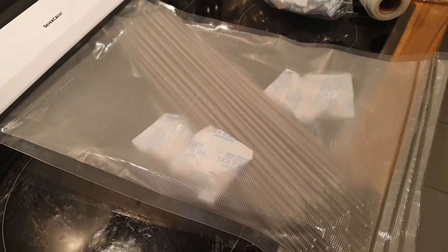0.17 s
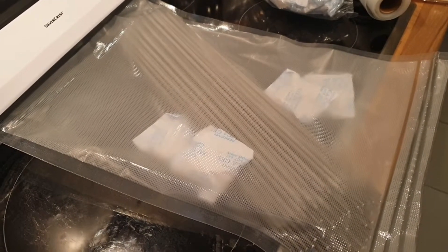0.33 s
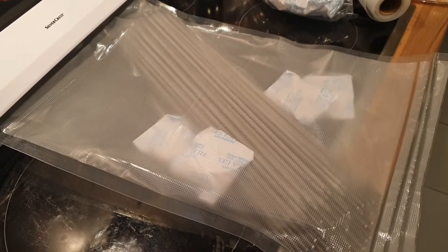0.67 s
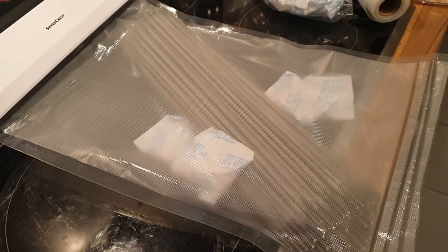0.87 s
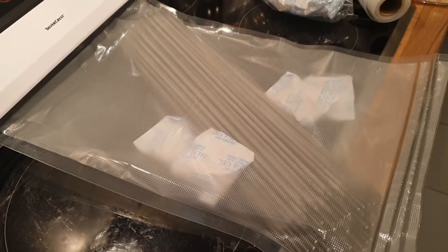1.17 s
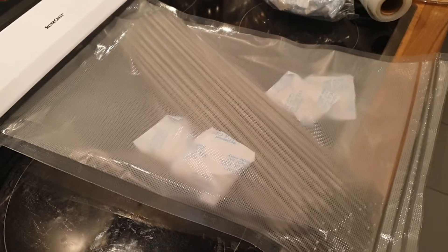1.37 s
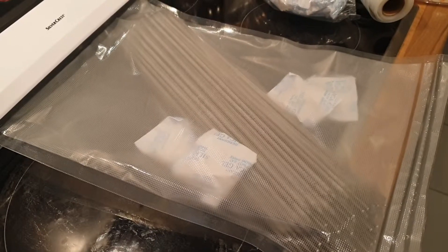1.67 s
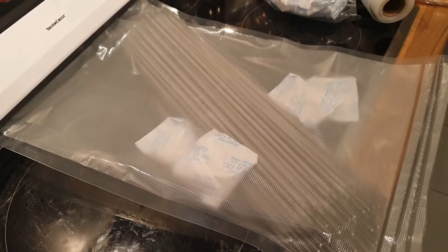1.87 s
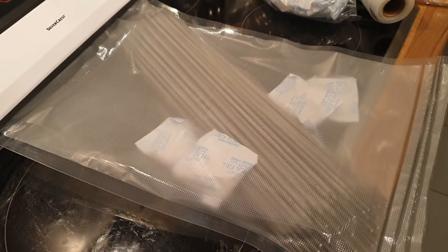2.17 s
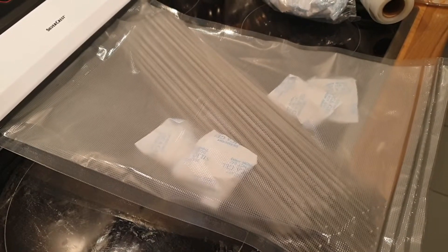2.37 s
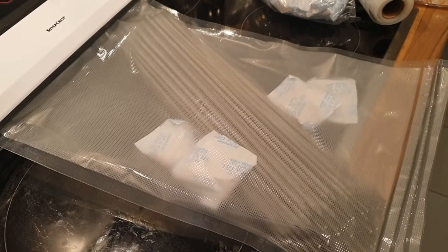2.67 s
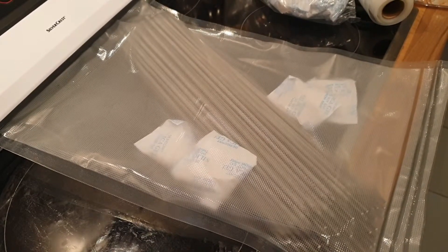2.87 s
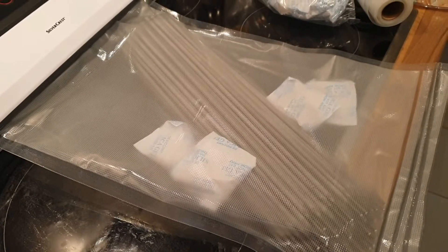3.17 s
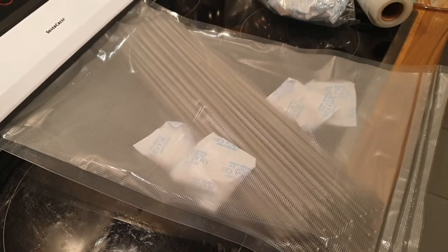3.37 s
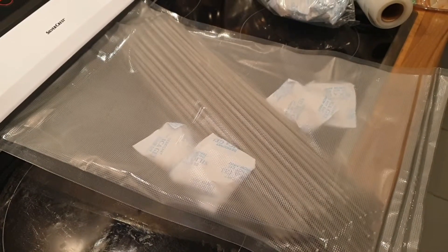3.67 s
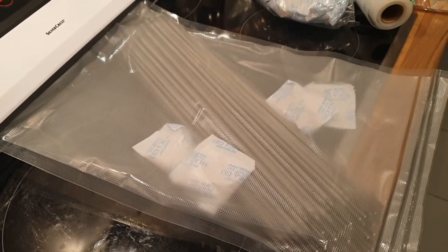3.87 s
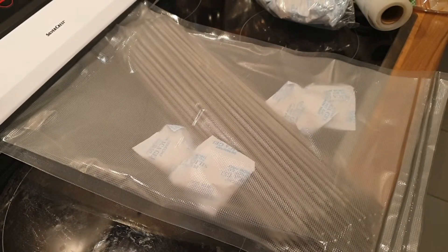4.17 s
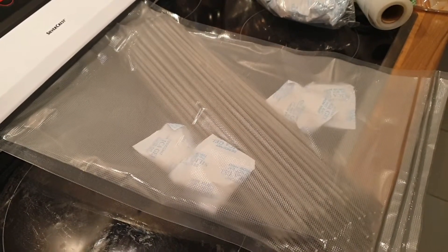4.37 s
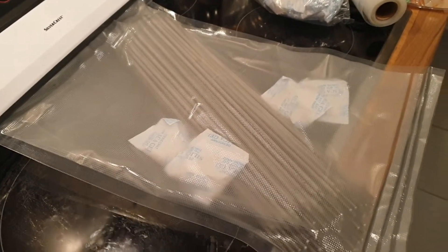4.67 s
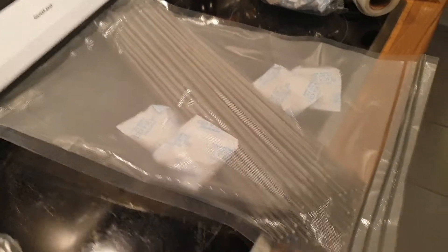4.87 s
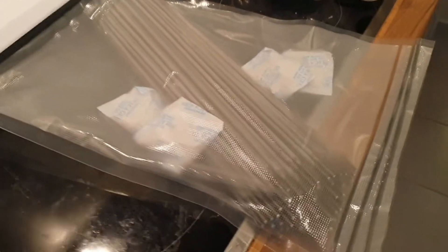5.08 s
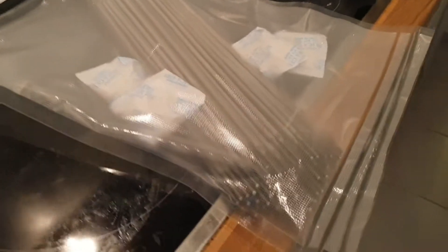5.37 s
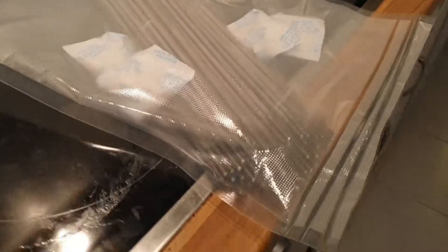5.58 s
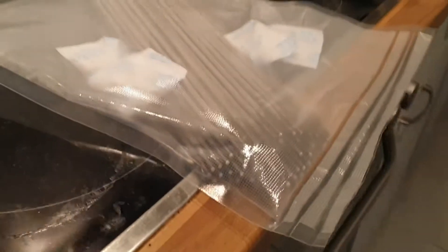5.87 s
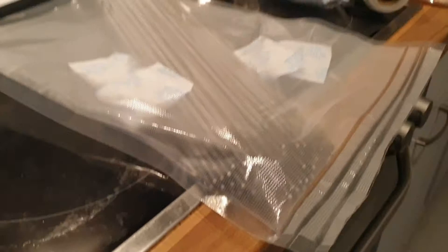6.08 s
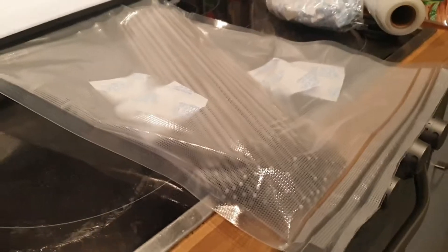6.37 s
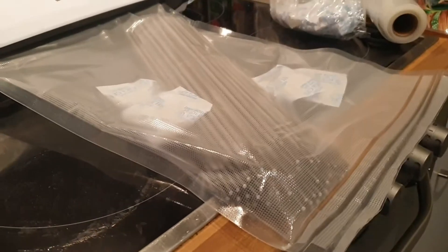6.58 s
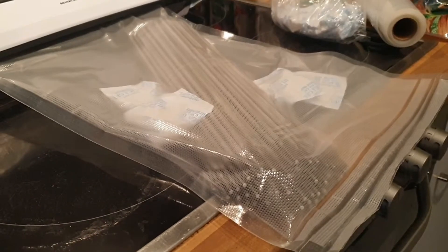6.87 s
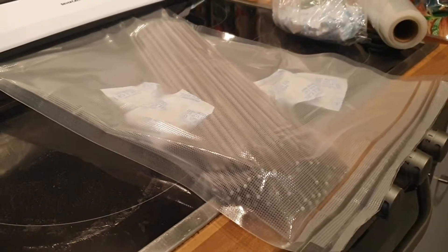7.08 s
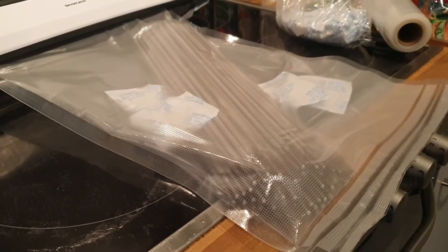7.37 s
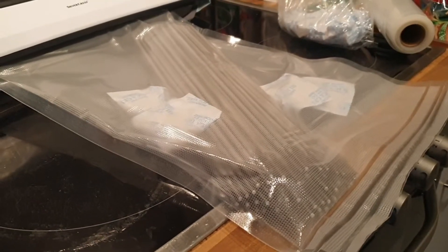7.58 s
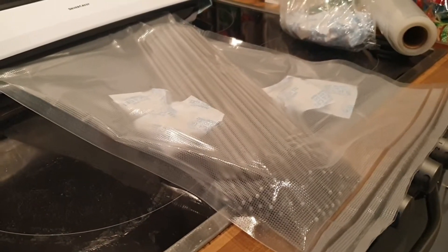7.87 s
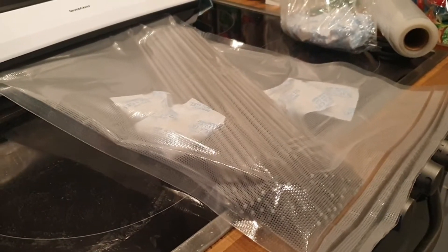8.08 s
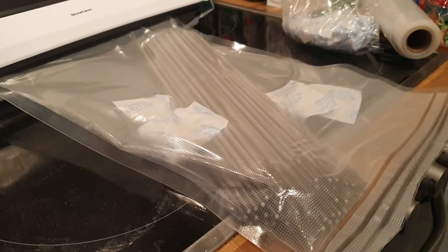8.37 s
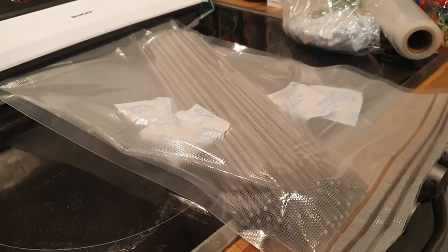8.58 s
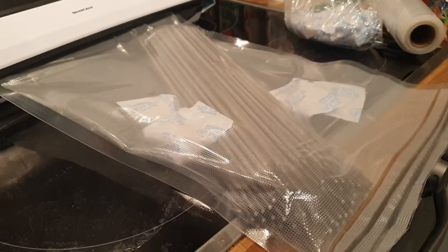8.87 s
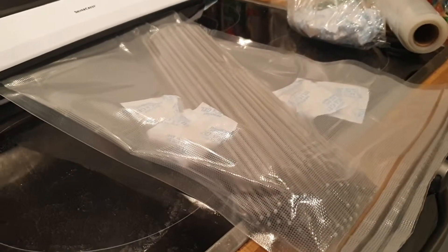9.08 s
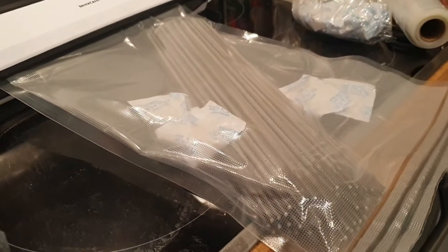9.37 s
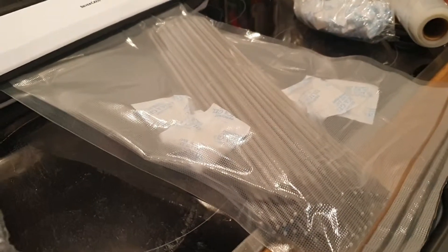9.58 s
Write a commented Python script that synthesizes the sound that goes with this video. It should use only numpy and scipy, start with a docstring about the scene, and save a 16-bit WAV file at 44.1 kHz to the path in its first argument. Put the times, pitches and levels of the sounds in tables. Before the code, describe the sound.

A small piston pump in a countertop vacuum sealer runs without pause, a low buzzing hum with a hard plastic ring, fine valve rattle and faint airy hiss. Thin plastic film ticks now and then. The close handheld stereo microphone moves around five to six seconds, changing the drone's colour, and a sharp crackle stands out near nine seconds.

```python
"""A small piston pump in a kitchen vacuum sealer drones evenly, slowing a little as the bag empties.
Each stroke is one repeated cycle: a thud, a knock, ringing plastic housing and a rattling valve.
Noise shaped by pitch makes the air, part of it in one puff a stroke; the bag film snaps and rustles.
A hand-held stereo microphone drifts between four spots and swings round midway, recolouring the drone."""
import sys
import numpy as np
from scipy import signal
from scipy.fft import rfft, irfft
from scipy.io import wavfile
from scipy.ndimage import uniform_filter1d

SR = 44100
rng = np.random.default_rng(int(sys.argv[2]) if len(sys.argv) > 2 else 0)


def digitize_waveform(pressure):
    """Quantize a signal to 16-bit integers and store it at the path in sys.argv[1].

    Rows of a 2-D input are taken as channels; values are limited to [-1, 1].
    """
    field = np.atleast_2d(pressure).T
    bounded = np.clip(field, -1, 1)
    quanta = np.round(bounded * 32767).astype(np.int16)
    wavfile.write(sys.argv[1], SR, quanta)


N = 429534  # length in samples
STROKE_HZ = 71.6  # mean strokes per second
CYCLE = 4096  # samples in one stored stroke
ORDERS = np.arange(CYCLE // 2 + 1)  # multiples of the stroke rate
LINE_SCALE = CYCLE / 2 * np.sqrt(2)  # a spectrum line of size 1 becomes a sine of rms 1


def gain_of(db):
    """Turns decibels into gain."""
    return 10 ** (np.asarray(db) / 20)


def evened(x):
    """Scales a signal to rms 1."""
    return x / np.sqrt(np.mean(x ** 2) + 1e-20)


def read(points, hz, axis=1):
    """Reads one column of a spectrum table, on a log-frequency axis."""
    table = np.transpose(points)
    return np.interp(np.log(hz + 1), np.log(table[0] + 1), table[axis])


def curve(points, t):
    """Reads a control curve at times t, with straight lines between its points."""
    return np.interp(t, *np.transpose(points))


def sides(db):
    """Gives left and right gains for a level difference; positive is louder on the left."""
    return gain_of([[db / 2], [-db / 2]])


def wander(size):
    """Makes smooth chance of rms 1 that changes over about size samples."""
    once = uniform_filter1d(rng.standard_normal(N), size)
    return evened(uniform_filter1d(once, size))


def turnover(hz, centre_hz, width_hz):
    """Gives the phase lag across a resonance, from 0 to pi."""
    return np.pi / 2 + np.arctan(2 * (hz - centre_hz) / width_hz)


# Where the microphone is: start_s, spot (0-3)
MIC_SPOT = [(0, 0), (2.8, 0.25), (2.95, 1), (4.8, 1), (5.05, 1.1), (5.45, 2), (5.8, 2.5), (6.3, 3),
            (9.74, 3)]


def swing(t):
    """Tells how far the microphone has swung round, 0-1, while it moves from spot 1 to spot 3."""
    return np.clip(curve(MIC_SPOT, t) / 2 - .5, 0, 1)


# How fast the pump runs: time_s, rate_hz (strokes per second)
PUMP_SPEED = [(0.0, 72.183), (1.4, 72.114), (2.6, 71.985), (3.3, 71.759), (4.5, 71.673), (6.0, 71.574),
              (7.4, 71.497), (8.9, 71.284), (9.74, 71.265)]


def strokes():
    """Adds up the speed into the crank angle in turns; the crank runs a hair early or late."""
    speed_hz = curve(PUMP_SPEED, np.arange(N) / SR)
    return .88 + np.cumsum(speed_hz) / SR + .0012 * wander(size=2000)


# Colour of the air noise before the swing: pitch_hz, left_db, right_db (both relative)
AIR_COLOUR_BEFORE = [(30.4, -78, -74), (124, -62.5, -80), (323, -80, -69), (430, -95, -77),
                     (625, -76, -72.5), (780, -80, -75), (1440, -78, -76), (1770, -64, -69),
                     (2400, -80, -81), (3300, -80, -82), (4900, -78.5, -97), (7600, -86.5, -85),
                     (8400, -90.5, -91.5), (10660, -78, -87.5), (13200, -88.5, -88), (15400, -88, -101)]
# Colour of the air noise after the swing: pitch_hz, left_db, right_db (both relative)
AIR_COLOUR_AFTER = [(30, -74, -73), (129, -65.5, -75), (310, -74, -77), (430, -89, -74), (630, -71, -71),
                    (850, -77.5, -87), (1570, -74, -75), (1850, -63, -78), (2330, -81, -94),
                    (3180, -80, -83.5), (5050, -83, -89.5), (7100, -84, -88.5), (8200, -93.5, -91),
                    (10500, -84, -92), (13100, -90, -87.5), (15400, -89, -102)]
# How alike the air is in both ears: pitch_hz, likeness (0-1)
AIR_LIKENESS = [(30, 0.91), (300, 1), (800, 0.25), (1400, 0.023), (3000, 0.068), (15000, 0.04)]
# How much of the air power comes in puffs: pitch_hz, share (0-1)
PUFF_SHARE = [(900, 0.028), (1800, 0.2), (4000, 0.1), (7000, 0.88), (10500, 0.44), (15000, 0.83)]


def air(turns):
    """Shapes noise into a steady flow plus a share that escapes in one puff a stroke."""
    hz = np.fft.rfftfreq(1024, 1 / SR)
    t = np.arange(N // 256 + 5) * 256 / SR
    swung = swing(t)
    colour_db = np.array([
        np.outer(read(AIR_COLOUR_BEFORE, hz, axis=ear), 1 - swung)
        + np.outer(read(AIR_COLOUR_AFTER, hz, axis=ear), swung)
        for ear in (1, 2)])
    # smooth chance changes over pitch and time
    patches = uniform_filter1d(rng.standard_normal((len(t), 513)).T, 8, 0)
    patches = evened(uniform_filter1d(patches, 16, 1))
    level = gain_of(colour_db + 1.5 * patches + 14.5)
    same = read(AIR_LIKENESS, hz)[:, None]
    share = read(PUFF_SHARE, hz)[:, None]
    fall = np.exp(-((turns + 0.16) % 1) / 1.0)
    rise = np.minimum((turns + .2) % 1 / 0.067, 1)
    puff = evened(fall * rise)
    out = np.zeros((2, N))
    for part, gate in ((1 - share, 1), (share, puff)):
        a, b, c, d = rng.standard_normal((len(t), 513, 4)).T
        left = a + 1j * b
        right = same * left + np.sqrt(1 - same ** 2) * (c + 1j * d)
        spectrum = np.array([left, right]) * level * np.sqrt(part)
        out += gate * signal.istft(spectrum, nperseg=1024, noverlap=768)[1][:, :N]
    return out


# Ringing modes of the bag film: pitch_hz, width_hz (wider dies sooner)
FILM_MODES = [(800, 500), (1200, 350), (1520, 330), (2500, 600), (3350, 500), (4600, 900), (6600, 1100),
              (10800, 2000)]


def film(centre_hz, spread, db):
    """Rings the film when a crease near centre_hz lets go; a harder crack reaches every mode."""
    t = np.arange(600)[:, None] / SR
    hz, width = np.transpose(FILM_MODES)
    octaves_away = np.log2(hz / centre_hz)
    share = .7 * gain_of(db) + np.exp(-(octaves_away / spread) ** 2)
    sign = (-1) ** np.arange(len(hz))  # neighbouring modes start in opposite directions
    modes = sign * share * np.exp(-np.pi * width * t) * np.sin(2 * np.pi * hz * t)
    ring = modes.sum(1)
    return ring / abs(ring).max()


# Single snaps: start_s, level_db, centre_hz, spread_octaves, left_right_db, right_late_ms
BAG_SNAPS = [(2.137, -24, 1900, .5, -5, 0.13), (2.9254, -33, 3000, .8, 3, .1),
             (3.402, -30, 1300, .5, -2, .1), (3.6886, -24, 3000, .3, 0, 0), (4.2755, -23, 1200, .45, 1, .2),
             (4.801, -32, 2300, .6, -4, 0), (5.0601, -34, 2600, 1.1, -3, 0),
             (6.876, -23.5, 6700, 0.66, 11, 0.18), (8.979, -9, 1900, .55, 2, .16),
             (9.0197, -17, 1400, .4, 1, .2), (9.042, -22, 1500, 0.94, 4, .2),
             (9.558, -23, 1800, .8, 4, 0.16)]
# Bunches of tiny creases: middle_s, length_s (middle to 1/e), level_db, centre_hz, left_right_db
BAG_RUSTLES = [(0.792, 0.058, -44.5, 3700, 2), (2.191, .04, -49, 3500, 2), (8.524, 0.056, -55, 5000, 2),
               (8.99, .018, -41, 3000, 2), (9.05, .025, -47, 2800, 2)]


def bag():
    """Plays single snaps with a short scatter from the counter, and a few bunches of tiny creases."""
    out = np.zeros((2, N + SR))
    t = np.arange(4000) / SR
    for start_s, db, hz, spread, pan_db, late_ms in BAG_SNAPS:
        scatter = .022 * rng.standard_normal((2, 4000)) * gain_of(-60 * t / .16) * (t > .002)
        scatter[[0, 1], [0, round(late_ms * SR / 1000)]] = 1  # the direct snap in each ear
        sound = signal.fftconvolve(scatter, film(hz, spread, db)[None])
        out[:, round(start_s * SR):][:, :sound.shape[1]] += gain_of(db) * sides(pan_db) * sound
    t = np.arange(-6000, 6000) / SR
    for middle_s, length, db, hz, pan_db in BAG_RUSTLES:
        creases = rng.standard_normal((2, len(t))) * (rng.random(len(t)) < .05)
        rustle = evened(signal.fftconvolve(creases, film(hz, 1.0, db)[None], "same", axes=1))
        rustle = rustle * np.exp(-(t / length) ** 2)
        out[:, round((middle_s + t[0]) * SR):][:, :len(t)] += gain_of(db) * sides(pan_db) * rustle
    return out[:, :N]


# Valve rattle: pitch_hz (at the starting speed), width_hz (of each of two stacked resonances),
# spot0_db, spot1_db, spot2_db, spot3_db, left_right_db
VALVE_RATTLE = [(2480, 680, -48, -53.5, -47.5, -54, 3), (3020, 2100, -58, -56, -59.5, -57, 7.5),
                (4160, 2200, -58, -59.5, -57, -63, -9), (5150, 370, -58.5, -58, -69, -65, 12.5),
                (5860, 460, -57, -60.5, -52, -57.5, 12), (6890, 1070, -58, -58, -56, -58, 6.5),
                (10600, 1100, -75, -82, -72, -61, 14)]


def rattle_cycle(spot):
    """Lets the valve flap land and bounce within one stroke, ringing its modes."""
    hz = ORDERS * PUMP_SPEED[0][1]
    turn = np.arange(CYCLE) / CYCLE
    landing = 0.37 + np.exp(-((turn - .05) % 1) / 0.058)
    lines = np.zeros((2, len(ORDERS)), complex)
    for mode_hz, width, *db, pan_db in VALVE_RATTLE:
        bounces = rng.standard_normal((2, CYCLE)) * landing
        ring = rfft(bounces) / (1 + 2j * (hz - mode_hz) / width) ** 2 * (hz > 2250)
        ring /= np.linalg.norm(ring, axis=1)[:, None]
        lines += gain_of(db[spot]) * sides(pan_db) * ring
    return irfft(lines) * LINE_SCALE


# Modes of the plastic housing: pitch_hz (at the mean speed), width_hz,
# before the swing: left_db, right_db, left_lead_rad; after it: left_db, right_db, left_lead_rad;
# gained in the small shift from spot 0 to spot 1: left_db, right_db
HOUSING_MODES = [(772.0, 20.0, -43.6, -43.7, 1.2, -42.0, -43.2, 1.5, 0.6, -1.5),
                 (990.0, 52.0, -44.9, -46.7, 0.2, -45.8, -52.4, 1.1, -1.8, -5.2),
                 (1124.0, 20.0, -39.3, -42.4, 1.7, -45.2, -48.7, -4.2, 3.3, -2.0),
                 (1301.0, 30.0, -45.9, -48.0, 3.5, -44.2, -46.2, 0.6, -4.6, 3.8),
                 (1397.0, 121.0, -44.3, -46.4, 2.6, -58.6, -70.0, -2.5, 1.6, 1.1),
                 (1588.0, 23.0, -40.0, -49.1, 4.0, -44.1, -47.7, -2.9, 1.3, -9.0),
                 (1679.0, 51.0, -33.4, -34.5, 3.4, -37.9, -37.7, 0.7, 0.8, -2.1),
                 (1738.0, 20.0, -43.6, -70.0, 3.7, -25.0, -38.6, -1.4, -9.0, -9.0),
                 (1796.0, 20.0, -39.8, -37.3, -0.8, -67.3, -34.0, -0.6, -0.0, 4.4),
                 (1889.0, 46.0, -42.1, -44.0, -2.2, -35.3, -61.0, 0.7, -0.3, -1.1),
                 (2040.0, 158.0, -49.6, -44.0, -1.9, -38.7, -48.0, -3.0, -3.6, -2.1),
                 (2059.0, 64.0, -44.7, -51.9, -2.3, -40.5, -51.5, -2.5, -0.4, -9.0),
                 (2199.0, 87.0, -36.1, -34.6, -4.4, -32.7, -65.5, 0.6, 9.0, 6.7),
                 (2197.0, 74.0, -34.3, -35.0, -4.5, -33.3, -58.2, 0.8, 6.0, 9.0)]


def housing_cycle(swung, shift):
    """Rings the housing with one blow a stroke, neighbouring modes in opposite directions."""
    hz = ORDERS * STROKE_HZ
    strike_turns = -0.1998  # when in the stroke the housing is struck
    lines = np.zeros((2, len(ORDERS)), complex)
    for k, row in enumerate(np.array(HOUSING_MODES)):
        mode_hz, width = row[:2]
        *db, lead = (1 - swung) * row[2:5] + swung * row[5:8]
        ear = gain_of(db + shift * row[8:]) * np.exp([.5j * lead, -.5j * lead])
        lines += (-1) ** k * ear[:, None] / (1 + 2j * (hz - mode_hz) / width)
    # only above the low orders, and fading steeply past 2300 Hz
    fade = (ORDERS > len(LOW_ORDERS)) / np.sqrt(1 + (hz / 2300) ** 30)
    return irfft(lines * fade * np.exp(-2j * np.pi * ORDERS * strike_turns)) * LINE_SCALE


# Low multiples of the stroke rate: order, before the swing: left_db, right_db; after it: left_db,
# right_db; gained in the small shift from spot 0 to spot 1: left_db, right_db
LOW_ORDERS = [(1, -32.5, -36, -33, -37.5, 0.5, 0.5), (2, -30, -31, -31, -31.5, -0.5, 0),
              (3, -34, -37, -38.5, -45.5, 0, 0), (4, -35, -35, -35, -35.5, 1, 0.5),
              (5, -47, -45.5, -56, -45, 1, 2.5), (6, -46, -46.5, -43, -43, 1, -2.5),
              (7, -45.5, -55.5, -44, -51, -4, 5.5), (8, -50, -40, -40.5, -44.5, 6.5, 0),
              (9, -39, -36, -36, -33.5, -2, 2)]
# How late the right port hears the low orders: before_swing_ms, after_swing_ms
RIGHT_LATE_MS = (.2, 0.06)


def thud_cycle(swung, shift):
    """Builds one piston stroke per ear from low sines, split into body thud and knock."""
    table = np.transpose(LOW_ORDERS)
    order = np.arange(1, len(LOW_ORDERS) + 1)
    hz = order * STROKE_HZ
    # above the body resonance the low orders turn over
    thud = turnover(hz, centre_hz=264.6, width_hz=26) + 2 * np.pi * order * -0.015
    # the first order is the crank's unbalance, which trails the piston by 0.2 turn
    thud += 2 * np.pi * 0.2 * (order == 1)
    # the knock is a quarter wave behind, with its own resonance
    knock = turnover(hz, centre_hz=545, width_hz=20) + np.pi / 2 + 2 * np.pi * order * -0.1565
    late_s = np.dot(RIGHT_LATE_MS, [1 - swung, swung]) / 1000
    ports = np.outer([-np.pi, np.pi], hz * late_s)
    db = (1 - swung) * table[1:3] + swung * table[3:5] + shift * table[5:]
    upper = ORDERS > 5.5  # orders 6-9 are the knock
    phase = np.where(upper[order], knock, thud) + ports
    lines = np.zeros((2, len(ORDERS)), complex)
    lines[:, order] = gain_of(db) * np.exp(-1j * phase)
    return irfft([lines * ~upper, lines * upper]) * LINE_SCALE


# Level of the knock and the housing ring over time: time_s, gain_db
PUMP_LOAD = [(0, 0), (2, 0.5), (4, 1), (5.4, 0.5), (6.5, 0), (7.5, 1), (8.5, 1.5), (9.1, 1), (9.74, 0.5)]
# How the drone is heard at spots 0-3: swing_share (0-1), shift_share (of the small shift)
SPOT_HEARING = [(0, -.5), (0, .5), (.51, 0), (1, 0)]


def pump(turns):
    """Repeats each spot's stroke and fades between spots; no two strokes are quite as strong."""
    t = np.arange(N) / SR
    out = np.zeros((2, N))
    spot = curve(MIC_SPOT, t)
    shake = gain_of(0.18 * wander(size=3000))
    load = gain_of(curve(PUMP_LOAD, t) + 0.31 * wander(size=3000))
    loose = gain_of(1.2 * wander(size=500))  # the flap lands less evenly than the piston
    step, part = np.divmod(turns * CYCLE, 1)
    step = step.astype(int) % CYCLE
    for k, (swung, shift) in enumerate(SPOT_HEARING):
        closeness = 1 - abs(spot - k)
        near = closeness > 0
        thud, knock = thud_cycle(swung, shift)
        body = knock + housing_cycle(swung, shift)
        for cycle, gain in ((thud, shake), (body, load), (rattle_cycle(k), loose)):
            here = cycle[:, step[near]]
            ahead = np.roll(cycle, -1, axis=1)[:, step[near]]
            between = here + part[near] * (ahead - here)
            out[:, near] += (closeness * gain)[near] * between
    return out


def scene():
    """Adds up the pump, the air and the bag, with pump and puffs on the same crank."""
    turns = strokes()
    return pump(turns) + air(turns) + bag()


def record(dry):
    """Removes the treble above 15600 Hz, the band limit of the recorder."""
    low_pass = signal.firwin(511, 15600, window=("kaiser", 9), fs=SR)
    return signal.oaconvolve(dry, low_pass[None], "same")


dry = scene()
out = record(dry)
digitize_waveform(out)
```